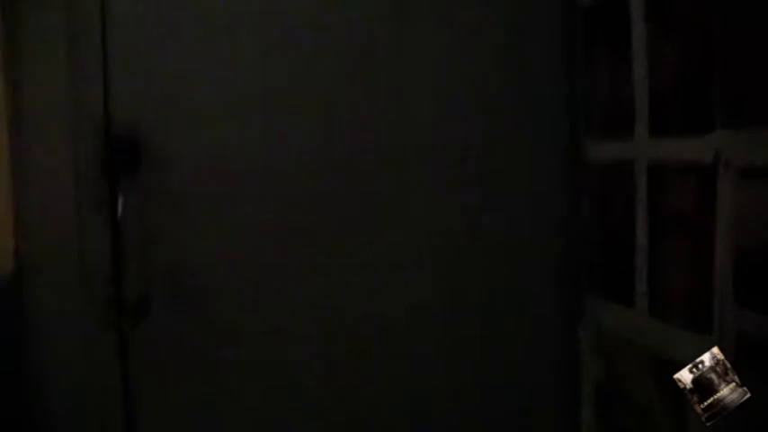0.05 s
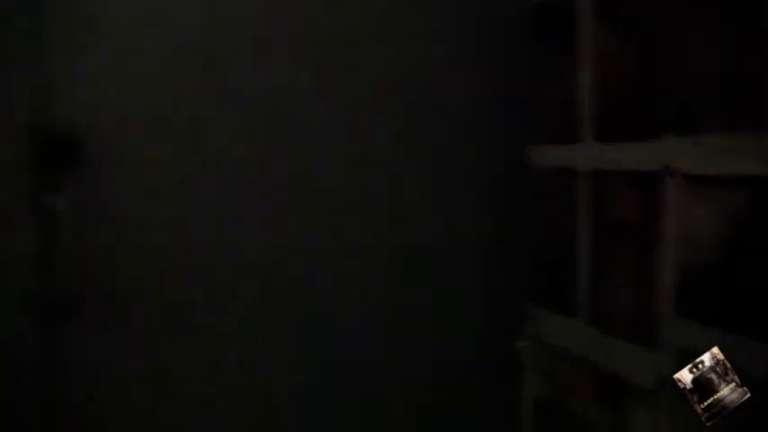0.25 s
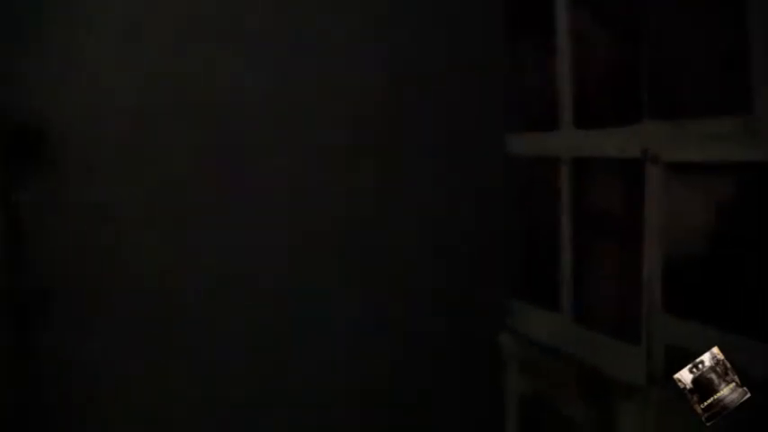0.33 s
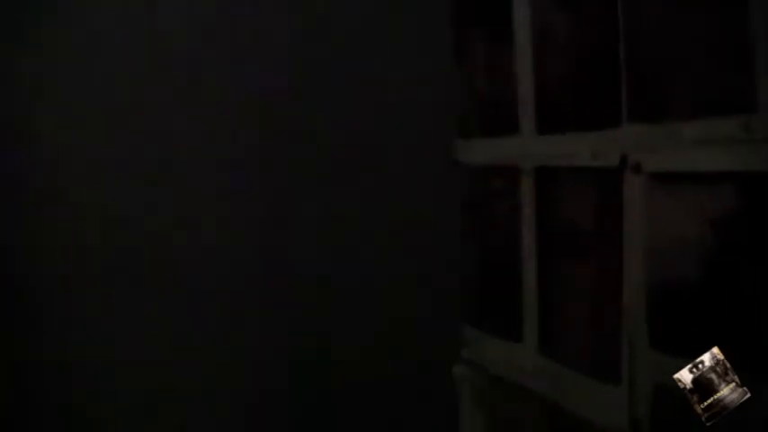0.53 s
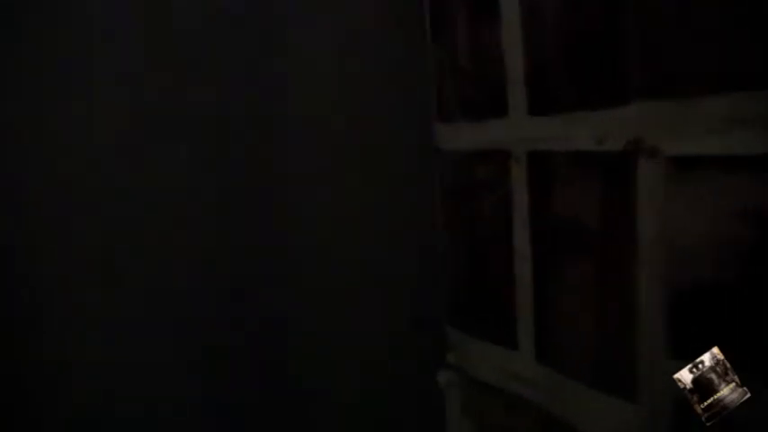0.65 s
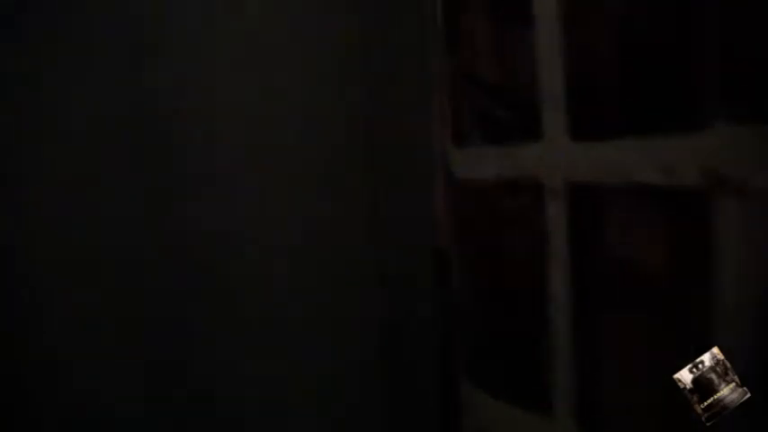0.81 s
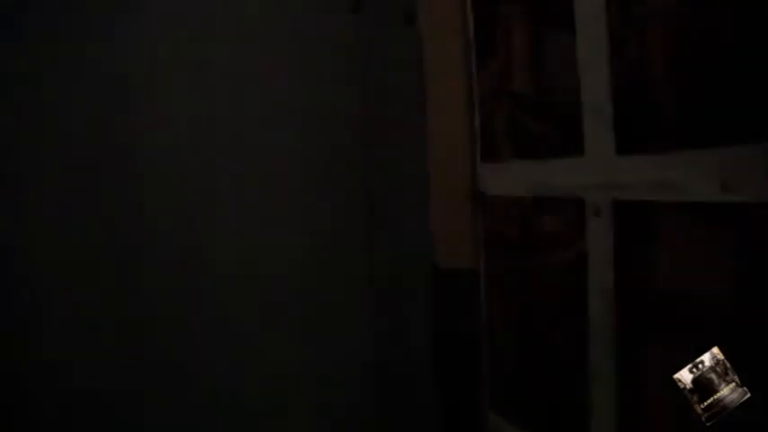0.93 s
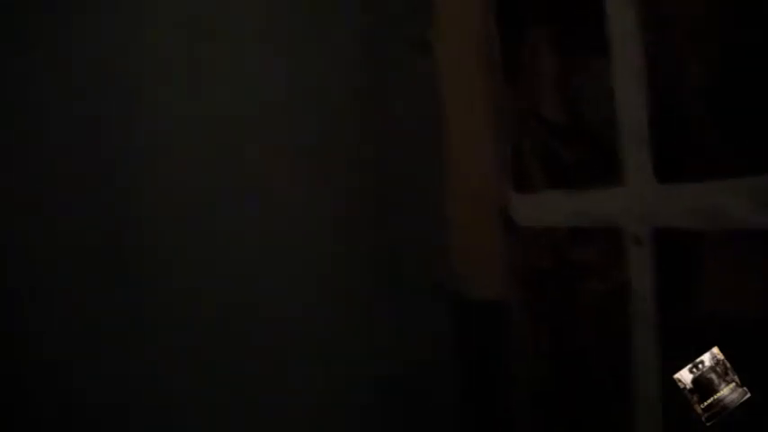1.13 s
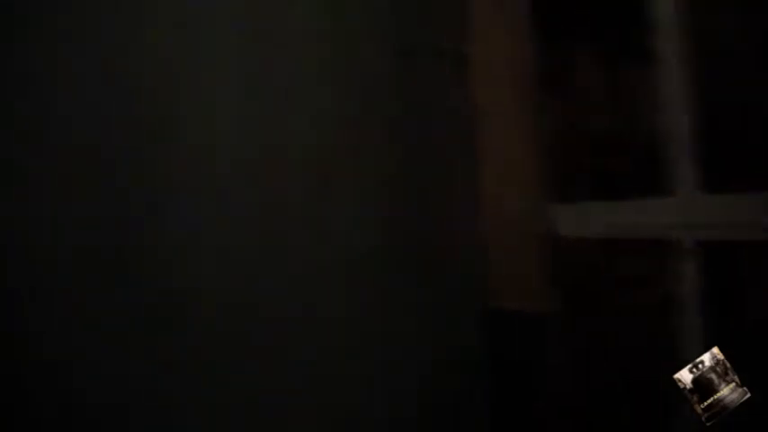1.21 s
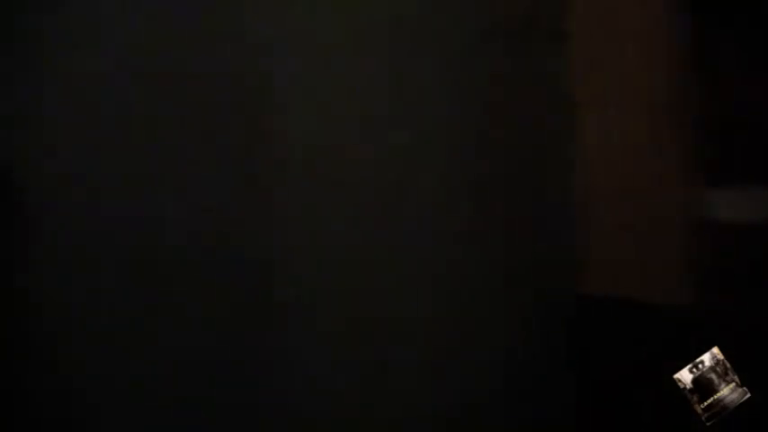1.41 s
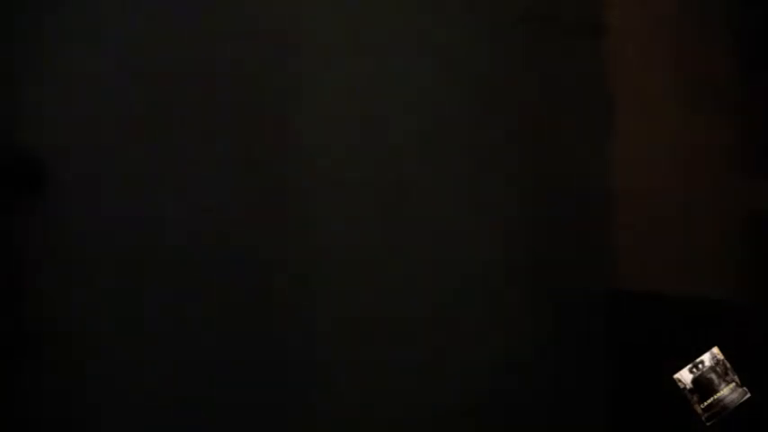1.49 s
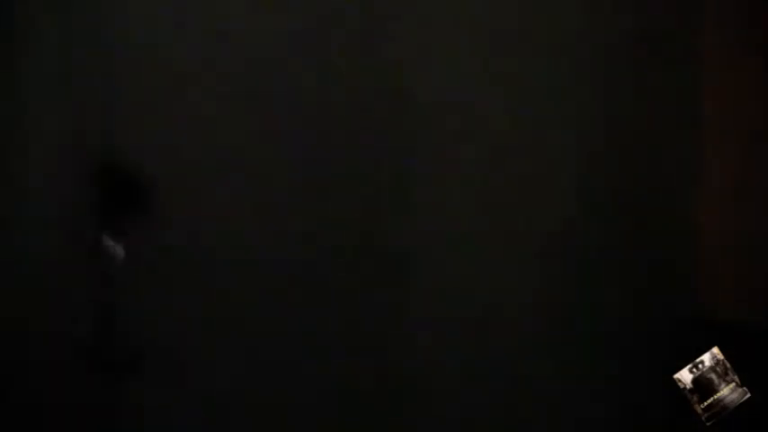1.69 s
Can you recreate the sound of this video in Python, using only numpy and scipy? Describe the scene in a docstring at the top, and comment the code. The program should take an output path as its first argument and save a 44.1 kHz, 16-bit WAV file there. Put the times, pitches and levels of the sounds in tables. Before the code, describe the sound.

A metal grille door is worked open close to the microphone in a hard-walled hallway. Light scraping and small ticks begin softly; a strong clank at 0.3 s starts rapid, uneven booming jolts, rattling bars and gritty steel scraping, with sharp hits near 0.65, 0.8 and 1.0 s. After 1.05 s it subsides, with a small clink near 1.2 s and faint ticks near 1.6 s over reverberant, quiet air.

```python
"""Hard-walled entrance: a metal grille door is worked open, close to the microphone.
Its frame booms in struck modes at each jolt; between jolts small bumps make it judder, hum and sway.
Steel scrapes on steel in streams of tiny contacts; loose bars chatter in bursts, click and ring briefly.
The door comes to rest and the hallway, a tail of decaying noise, rings out over quiet air."""
import sys
import numpy as np
from scipy import signal
from scipy.fft import rfft, irfft, next_fast_len
from scipy.io import wavfile
from scipy.ndimage import map_coordinates

SR = 44100
rng = np.random.default_rng(int(sys.argv[2]) if len(sys.argv) > 2 else 0)


def unload_audio(sound):
    """Save the sound as a 16-bit wav file, at the path given as the first command line argument."""
    columns = np.transpose(np.atleast_2d(sound))
    # keep every value between -1 and 1, then stretch to whole-number steps
    steps = np.round(np.clip(columns, -1, 1) * 32767)
    wavfile.write(sys.argv[1], SR, steps.astype(np.int16))


N = 77175
TIME = np.arange(N) / SR
TOP_HZ = 15750  # upper band limit


def amp(db):
    """Decibels to gain."""
    return 10 ** (np.asarray(db) / 20)


def unit(x):
    """Scale to rms 1."""
    return x / np.sqrt(np.mean(x ** 2) + 1e-20)


def along(points, hz):
    """Interpolate (f, value) points on a log-frequency axis."""
    f, value = np.transpose(points)
    return np.interp(np.log(hz + 1), np.log(f + 1), value)


def level(rows):
    """Gain per sample from (t/s, level/dB) rows."""
    return amp(np.interp(TIME, *np.transpose(rows)))


def bump(hz, centre_hz, octaves):
    """Bell curve of height 1 on a log-frequency axis."""
    return np.exp(-.5 * (np.log2((hz + 1) / centre_hz) / octaves) ** 2)


def coloured(x, curve):
    """Shape x by a dB function of frequency."""
    m = next_fast_len(N + SR // 4)
    gain = amp(curve(np.fft.rfftfreq(m, 1 / SR)))
    return irfft(rfft(x, m) * gain, m)[..., :N]


def noise(curve):
    """Coloured noise of rms 1."""
    return unit(coloured(rng.standard_normal(N), curve))


def contacts(rate):
    """Tiny impacts of random size at random moments, rate a second."""
    return unit((rng.random(N) < rate / SR) * rng.standard_normal(N))


def release(t, hold, t60):
    """Full level until hold, then exponential decay."""
    return amp(-60 * np.maximum(t - hold, 0) / t60)


def envelope(start, rise, hold, t60):
    """Linear rise, hold counted from the start, and exponential release."""
    t = np.maximum(TIME - start, 0)
    return np.minimum(t / rise, 1) * release(t, hold, t60)


def ring(modes, start=0, colour=lambda hz: 0, hold=0, scatter_db=1, detune=0.012):
    """Damped modes struck at start, a little different each time, of unit summed power."""
    hz, db, t60 = np.transpose(modes)[:, :, None]
    t = np.maximum(TIME - start, 0)
    gain = amp(db + colour(hz) + scatter_db * rng.standard_normal(hz.shape))
    hz = hz * (1 + detune * rng.standard_normal(hz.shape))
    sign = (-1) ** (np.arange(len(hz))[:, None] // 4)  # polarity flips every four modes
    waves = sign * gain * np.sin(2 * np.pi * hz * t) * release(t, hold, t60)
    return np.sum(waves, 0) / np.sqrt(np.sum(gain ** 2) / 2)


def through(x, response):
    """Play x through an impulse response of unit energy."""
    return signal.fftconvolve(x, response / np.linalg.norm(response))[:N]


# modes of the door frame, also used by judder() [f/Hz, relative level/dB, t60/s]
FRAME_MODES = [(104.1, -12, 1), (151.66, -0.5, 0.58), (164.8, -4.5, 0.65), (212.5, -6, 0.63),
               (316.6, -4.5, 0.71), (362, -16, 0.26), (388.6, -6.5, 0.32), (443.2, -12.5, 0.13),
               (473.6, -12, 0.65), (540.6, -7.5, 0.5), (627.5, -17, 0.57), (744, -13.5, 0.56),
               (854, -15, 0.068)]
# jolts of the frame [t/s, relative level/dB, centre f/Hz, time it keeps shuddering/s]
FRAME_JOLTS = [(.003, -35.5, 218, 0.037), (.072, -33.5, 457, 0.03), (0.196, -26, 385, 0.015),
               (0.306, -13.5, 154, 0.037), (.306, -18.5, 426, 0.032), (0.401, -25, 515, 0.027),
               (.403, -25.5, 207, 0.036), (.452, -17, 123, 0.0097), (.643, -13, 150, 0.031),
               (0.736, -24, 151, 0.018), (.783, -16.5, 423, 0.026), (0.867, -22.5, 111, 0.021),
               (0.921, -17.5, 145, 0.014), (.997, -23.5, 490, 0.028), (.999, -14, 146, 0.011),
               (1.039, -17.5, 194, 0.023), (1.194, -35.5, 785, 0.032), (1.344, -34.5, 110, 0.015),
               (1.558, -44, 1300, 0.023), (1.691, -43, 413, .002)]
# dull body of a jolt [f/Hz, relative level/dB]
THUD_SPECTRUM = [(30, -66), (75, -40), (115, -5.5), (200, 1), (480, -3), (700, -10), (1200, -16),
                 (2000, -33), (6000, -67)]
JOLT_RISE_S, JOLT_FOCUS_DB, JOLT_OCTAVES = 0.0031, 15.5, 0.29
THUD_DB, THUD_T60_S, HAND_T60_S = -5, 0.098, .2
FRAME_LOWEST_HZ = 75.6


def jolts():
    """Frame modes boom over a dull thud; where a jolt lands picks the leading modes, and the hand damps them."""
    out = np.zeros(N)
    for s, db, centre_hz, hold in FRAME_JOLTS:
        colour = lambda hz: JOLT_FOCUS_DB * bump(hz, centre_hz, JOLT_OCTAVES)
        thud = noise(lambda hz: along(THUD_SPECTRUM, hz) + colour(hz))
        thud = thud * envelope(s, JOLT_RISE_S, hold, THUD_T60_S)
        boom = ring(FRAME_MODES, s, colour, hold) * envelope(s, JOLT_RISE_S, hold, HAND_T60_S)
        out += amp(db - 4.5) * (boom + amp(THUD_DB) * thud)
    return signal.sosfilt(signal.butter(2, FRAME_LOWEST_HZ, "high", fs=SR, output="sos"), out)


# juddering of the moving door [t/s, relative level/dB]
JUDDER_LEVEL = [(0, -35), (.06, -51), (.12, -37), (.29, -36), (.4, -23), (.5, -28), (.58, -34.5),
                (.68, -24), (1.02, -25), (1.13, -30), (1.25, -38.5), (1.6, -47), (1.75, -59.5)]
# rumble of the door between its modes [f/Hz, relative level/dB]
RUMBLE_SPECTRUM = [(25, -49), (62, -35), (85, -47), (110, -1.5), (180, 9.5), (280, -4.5), (500, -2.5),
                   (700, -15), (1100, -34), (2000, -28.5), (4000, -33.5), (9000, -74)]
JUDDERS_PER_S, MODES_DB, RUMBLE_DB = 900, -6.0, -5


def judder():
    """Small bumps excite the moving frame's modes and the broad rumble between them."""
    modal = unit(through(contacts(JUDDERS_PER_S), ring(FRAME_MODES)))
    rumble = unit(coloured(contacts(JUDDERS_PER_S), lambda hz: along(RUMBLE_SPECTRUM, hz)))
    return level(JUDDER_LEVEL) * (amp(MODES_DB) * modal + amp(RUMBLE_DB) * rumble)


# the frame hums on one low mode as it is dragged [t/s, length/s, level/dB, f/Hz]
FRAME_HUMS = [(0.096, 0.28, -37, 153.8), (0.526, 0.13, -33, 151.3), (0.746, 0.37, -34.5, 106),
              (1.12, 0.1, -40.5, 107.7), (1.348, 0.15, -43, 169.3), (1.525, 0.28, -56.5, 164.5)]
HUM_RISE_S, HUM_T60_S, HUM_WAVER_HZ, HUM_WAVER_PER_S = 0.0034, 0.39, 2.57, 27


def hums():
    """The dragged frame sounds one low mode at a time, its pitch wavering at random."""
    out = np.zeros(N)
    for s, length, db, hz in FRAME_HUMS:
        waver = map_coordinates(rng.standard_normal(size=200), [TIME * HUM_WAVER_PER_S])
        phase = 2 * np.pi * np.cumsum(hz + HUM_WAVER_HZ * waver) / SR
        tone = np.sqrt(2) * np.sin(phase)  # rms 1
        out += amp(db) * tone * envelope(s, HUM_RISE_S, length, HUM_T60_S)
    return out


# low sway of the whole door while it moves [t/s, level/dB]
SWAY_LEVEL = [(0, -58), (.3, -59), (.5, -49), (.8, -41), (1.05, -60), (1.4, -64), (1.75, -83)]
SWAY_HZ, SWAY_OCTAVES = 46, 0.18


def sway():
    """The whole door sways as a narrow band of deep noise."""
    return level(SWAY_LEVEL) * noise(lambda hz: 20 * np.log10(bump(hz, SWAY_HZ, SWAY_OCTAVES) + 1e-9))


PINGS_PER_S, PING_T60_S, PING_SCATTER_DB, PING_SHARE = 2400, .02, 4, .5  # share of power


def pings():
    """A stream of tiny steel contacts, each ringing briefly at its own pitch."""
    when, pitch, size = rng.random((int(PINGS_PER_S * N / SR), 3)).T[:, :, None]
    k = np.arange(int(PING_T60_S * SR))
    gain_db = -PING_SCATTER_DB * np.log(1 - size) / 2  # many weak pings, few strong ones
    grains = amp(gain_db - 60 * k / len(k)) * np.sin(2 * np.pi * pitch * TOP_HZ * k / SR)
    places = (when * N).astype(int) + k
    return unit(np.bincount(places.ravel(), grains.ravel(), N)[:N])


def grit(rate):
    """Rough steel gives ringing pings mixed with bare impacts."""
    return np.sqrt(PING_SHARE) * pings() + np.sqrt(1 - PING_SHARE) * contacts(rate)


# steel sliding on steel [t/s, relative level/dB]
SLIDE_LEVEL = [(0, -51), (.055, -48.5), (.075, -41.5), (.15, -36), (.29, -34), (.34, -33.5), (.5, -38),
               (.545, -43), (.62, -31.5), (.69, -37), (.75, -38), (.79, -25.5), (.83, -35.5), (.97, -34.5),
               (1.06, -44.5), (1.17, -49.5), (1.35, -56.5), (1.75, -74)]
# colour of the scrape [f/Hz, relative level/dB]
SCRAPE_SPECTRUM = [(150, -3.5), (500, 1), (850, 5.5), (1200, 3.5), (1600, -3), (2100, -3), (2700, -10.5),
                   (3300, -6), (4600, -13.5), (6600, -12), (7700, -15), (10000, -17), (12000, -31.5),
                   (15500, -69)]
SLIPS_PER_S = 4500


def scrape():
    """Sliding steel sticks and slips in a dense stream of tiny contacts."""
    slips = coloured(grit(SLIPS_PER_S), lambda hz: along(SCRAPE_SPECTRUM, hz))
    return level(SLIDE_LEVEL) * unit(slips)


# colour of the struck bars [f/Hz, relative level/dB]
BAR_SPECTRUM = [(200, -20), (700, 13.5), (1500, 2), (2700, -1), (4500, -3.5), (7000, -4.5), (8000, -8.5),
                (10000, -6), (12000, -20.5), (15500, -43)]
FOCUS_OCTAVES, OWN_RING_DB, OWN_RING_OCTAVES = .55, 6, .025


def focus(centre_hz, boost_db):
    """Spectrum of one struck bar: strongest around its own pitch, where it also rings."""
    def curve(hz):
        around = boost_db * bump(hz, centre_hz, FOCUS_OCTAVES)
        own_ring = OWN_RING_DB * bump(hz, centre_hz, OWN_RING_OCTAVES)
        return along(BAR_SPECTRUM, hz) + around + own_ring
    return curve


# chatter of the loose bars and the latch [t/s, length/s, relative level/dB, centre f/Hz, t60/s]
CHATTER_BURSTS = [(0.06, 0.018, -36, 9400, 0.097), (0.13, 0.018, -40, 6600, 0.049),
                  (0.174, 0.051, -43.5, 6960, 0.099), (0.347, 0.018, -27.5, 9600, 0.096),
                  (0.413, 0.054, -38, 8440, 0.26), (0.446, 0.067, -39, 2360, 0.11),
                  (0.553, 0.045, -33.5, 6820, 0.13), (0.603, 0.07, -38.5, 2990, 0.36),
                  (0.699, 0.021, -33, 6600, 0.18), (0.76, 0.013, -30, 8000, 0.044),
                  (0.77, 0.0054, -29, 9100, 0.02), (0.828, 0.037, -32.5, 3900, 0.078),
                  (0.928, 0.041, -36.5, 3500, 0.2), (1.179, 0.0095, -41.5, 7340, 0.21),
                  (1.193, 0.017, -44.5, 2360, 0.22)]
CHATTER_RISE_S, CONTACTS_PER_S, CHATTER_FOCUS_DB = 0.0085, 4000, 5


def chatter():
    """Loose bars and the latch rattle in short bursts of contacts, each around its own pitch."""
    out = np.zeros(N)
    rattle = grit(CONTACTS_PER_S)
    for s, length, db, centre_hz, t60 in CHATTER_BURSTS:
        burst = unit(coloured(rattle, focus(centre_hz, CHATTER_FOCUS_DB)))
        out += amp(db) * burst * envelope(s, CHATTER_RISE_S, length, t60)
    return out


# sharp clicks of steel [t/s, relative level/dB, centre f/Hz]
STEEL_CLICKS = [(0.068, -34, 9300), (0.305, -25.5, 6000), (0.3963, -26, 3600), (0.43, -31, 9700),
                (0.637, -31, 2020), (0.77, -25.5, 13300), (1.602, -52, 5730), (1.69, -57, 2950)]
CLICK_RISE_S, CLICK_T60_S, CLICK_FOCUS_DB = 0.00018, 0.047, 6


def clicks():
    """A single blow on steel is a sharp onset of coloured noise that dies fast."""
    out = np.zeros(N)
    for s, db, centre_hz in STEEL_CLICKS:
        out += amp(db) * noise(focus(centre_hz, CLICK_FOCUS_DB)) * envelope(s, CLICK_RISE_S, 0, CLICK_T60_S)
    return out


# modes of the bars [f/Hz, relative level/dB, t60/s]
RESONANT_BARS = [(1243, -0.5, 0.17), (2144, -3.5, 0.064), (2255, 4.5, 0.13), (3106, 7, 0.16)]
BAR_RING_DB, STEEL_DB = -20.5, -3.5


def steel():
    """Scrape, chatter and clicks all set the bars ringing in their modes."""
    struck = scrape() + chatter() + clicks()
    return amp(STEEL_DB) * (struck + amp(BAR_RING_DB) * through(struck, ring(RESONANT_BARS)))


# single bars that are caught and ring clearly [t/s, level/dB, f/Hz, t60/s]
CAUGHT_BARS = [(.303, -26, 5600, 0.028), (.359, -26, 9370, 0.062), (.391, -32.5, 3480, .055),
               (0.443, -31.5, 5470, 0.042), (0.464, -34.5, 2270, .16), (.817, -32, 6900, 0.028),
               (.936, -35, 4390, 0.083), (1.18, -44.5, 4540, 0.094), (1.187, -48.5, 2254, 0.13),
               (1.601, -56, 5890, 0.022)]
RING_RISE_S, RING_PAIR_HZ = 0.0039, 45.46  # pair spacing is the standard deviation


def rings():
    """A caught bar sings on a close pair of modes, one for each way that it bends."""
    out = np.zeros(N)
    for s, db, hz, t60 in CAUGHT_BARS:
        first = np.sin(2 * np.pi * hz * TIME)
        second_hz = hz + RING_PAIR_HZ * rng.standard_normal()
        second = .5 * np.sin(2 * np.pi * (second_hz * TIME + rng.random()))
        out += amp(db) * (first + second) * envelope(s, RING_RISE_S, 0, t60)
    return out


# decay of the hallway [f/Hz, t60/s]
HALL_DECAY = [(100, 0.49), (500, 0.77), (2000, 1), (5000, 0.59), (10000, 0.27)]
STEEL_WET_DB, FRAME_WET_DB = -13, -9


def hall(x):
    """The hallway answers with a tail of noise whose bands decay separately; the treble dies first."""
    hz, t, bands = signal.stft(rng.standard_normal(SR), SR, nperseg=256)
    decay = amp(-60 * t / along(HALL_DECAY, hz)[:, None])
    return through(x, signal.istft(bands * decay, SR, nperseg=256)[1])


# stereo width [f/Hz, side over mid level/dB]
SIDE_WIDTH = [(40, -20), (120, -88), (250, -25), (1000, -17.5), (2800, -14.5), (5500, -9), (10000, -8),
              (13000, 4.5)]
LEFT_DB = 0.12  # left is raised and right lowered by this


def spread(x, other, walls_t60_s=0.076):
    """The scatter of the near walls differs between left and right, mostly in the treble."""
    scatter = rng.standard_normal(N) * envelope(0, 0.00067, 0, walls_t60_s)
    side = coloured(through(other, scatter), lambda hz: along(SIDE_WIDTH, hz))
    return np.array([x + side, x - side]) * amp([[LEFT_DB], [-LEFT_DB]])


# colour of the quiet air [f/Hz, relative level/dB]
AIR_SPECTRUM = [(25, -44), (70, -21), (170, 6.5), (500, 6.5), (1500, -5), (4000, -18.5), (10000, -35),
                (15000, -36)]
AIR_DB = -53.5


def air():
    """The quiet air of the hallway is steady coloured noise."""
    return amp(AIR_DB) * noise(lambda hz: along(AIR_SPECTRUM, hz))


def scene():
    """Frame and bars in the hallway, over its quiet air."""
    boom = jolts() + judder() + hums() + sway()
    caught = rings()

    def heard(clatter):
        """Direct sound, the hallway's answer and air."""
        wet = amp(FRAME_WET_DB) * hall(boom) + amp(STEEL_WET_DB) * hall(clatter)
        return boom + clatter + wet + air()

    # fresh random contacts and hall tails feed the side signal
    return spread(heard(steel() + caught), heard(steel() + caught))


LOW_CUT_HZ = 60


def record(dry):
    """The microphone loses the deepest bass, and the sound above the band limit is cut by 120 dB."""
    thin = signal.sosfilt(signal.butter(2, LOW_CUT_HZ, "high", fs=SR, output="sos"), dry)
    return coloured(thin, lambda hz: -120 * (hz > TOP_HZ))


dry = scene()
out = record(dry)
unload_audio(out)
```